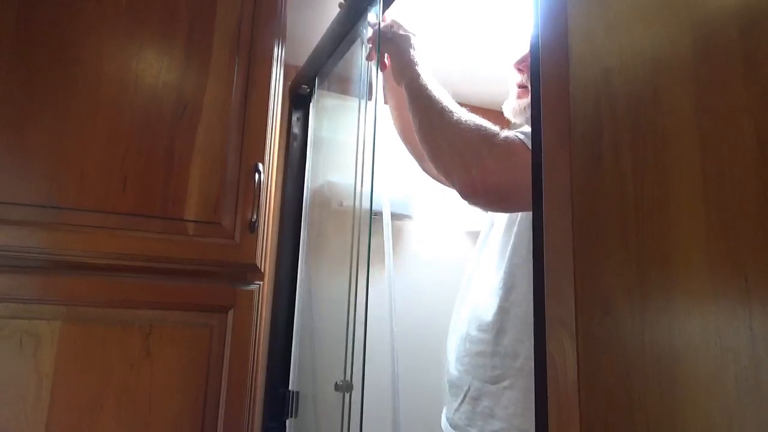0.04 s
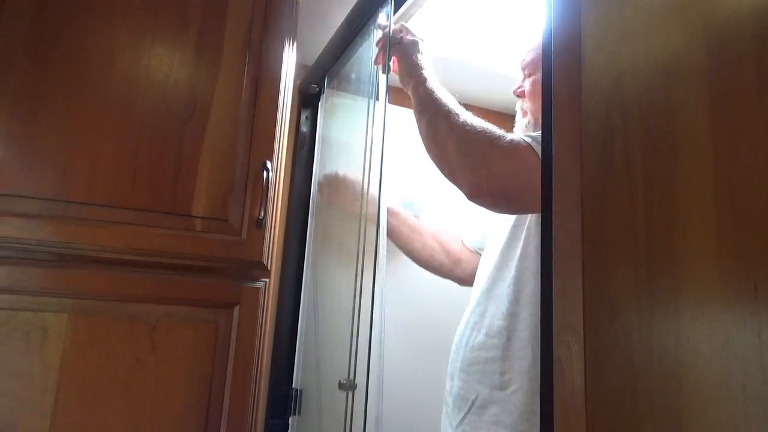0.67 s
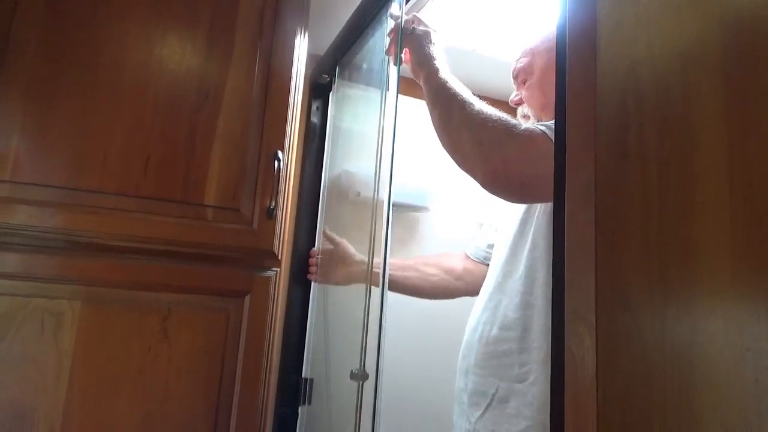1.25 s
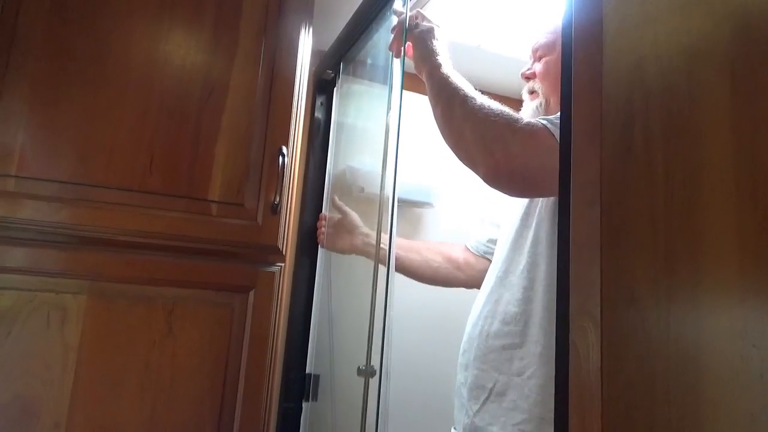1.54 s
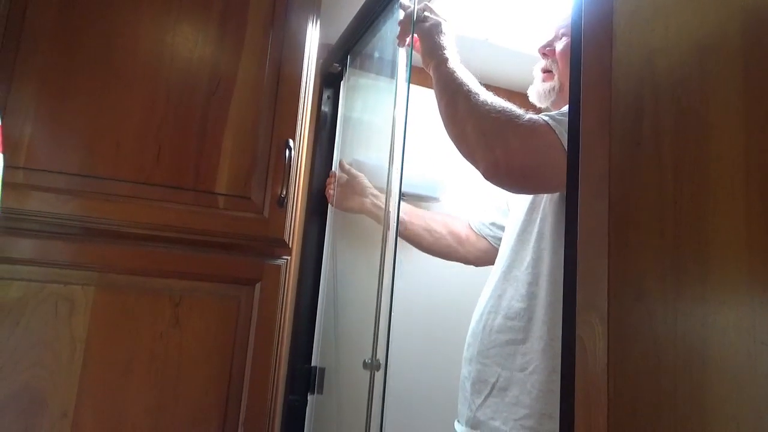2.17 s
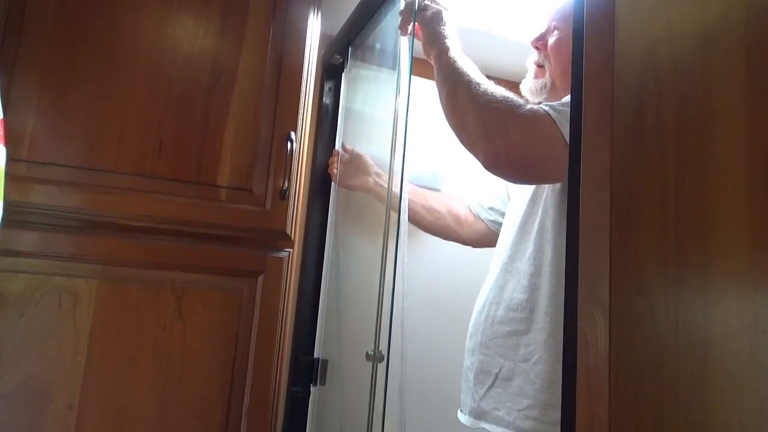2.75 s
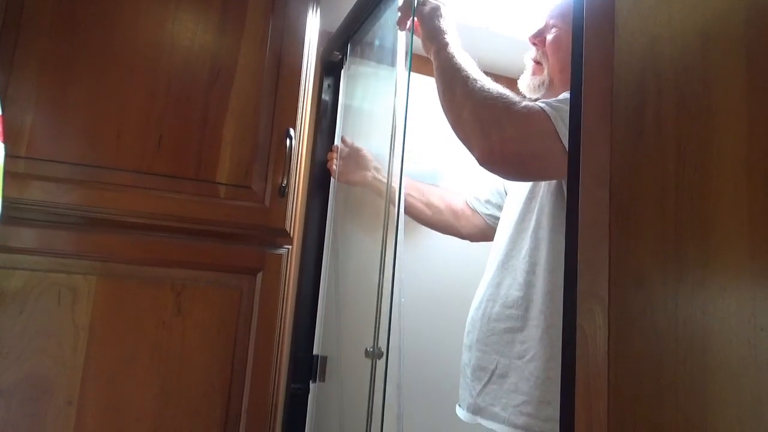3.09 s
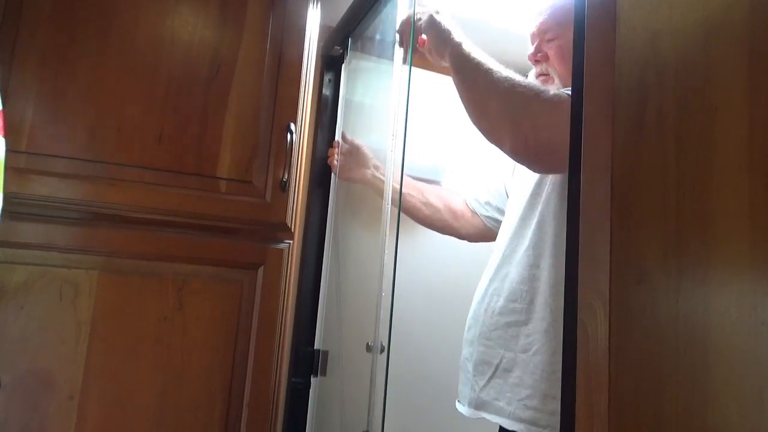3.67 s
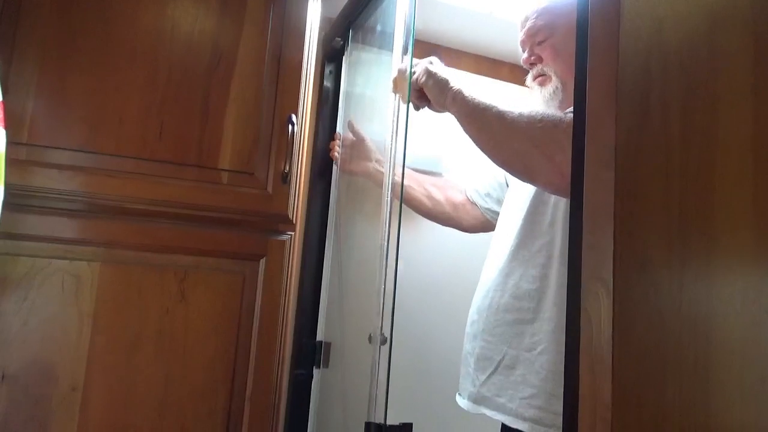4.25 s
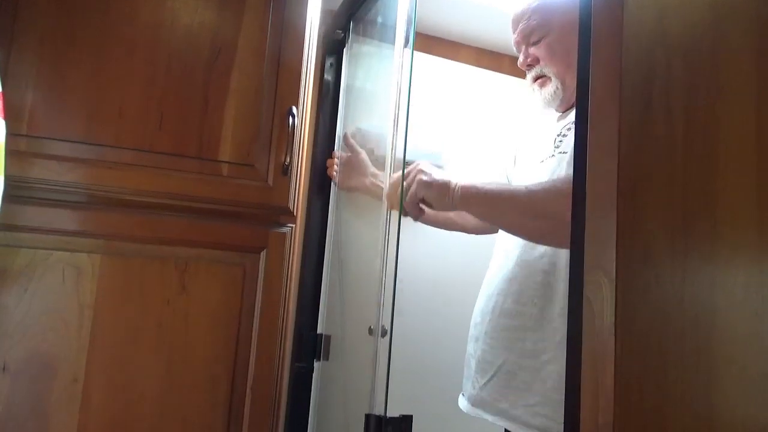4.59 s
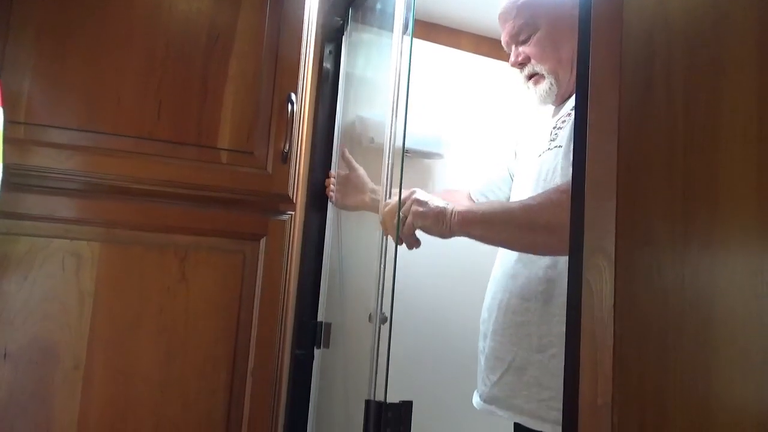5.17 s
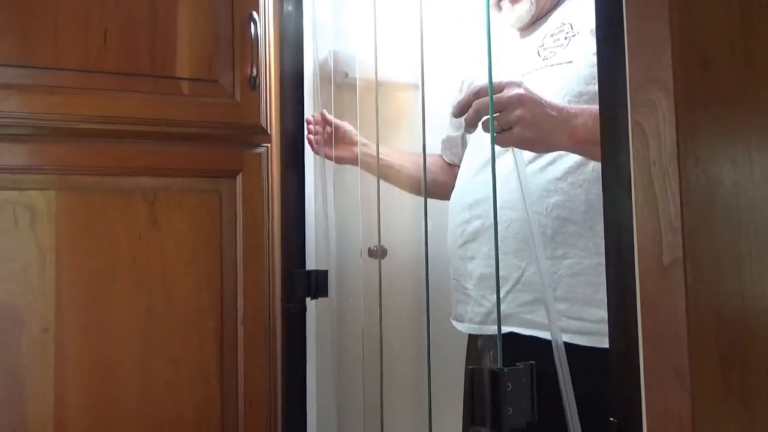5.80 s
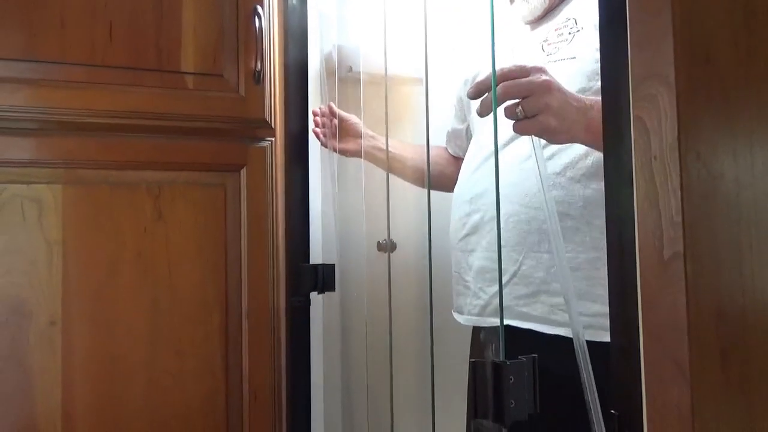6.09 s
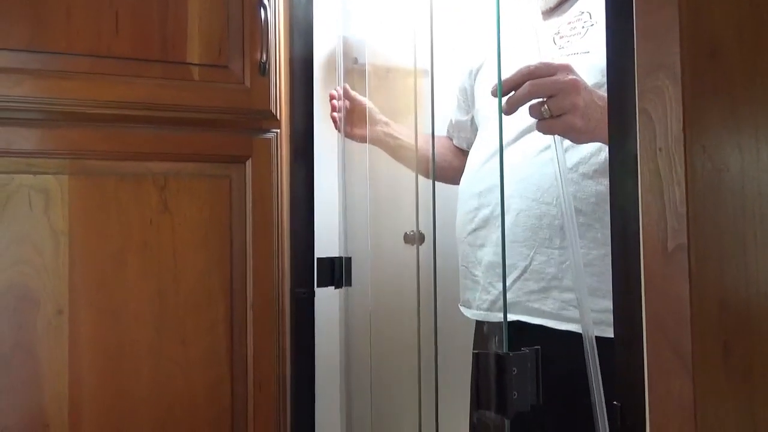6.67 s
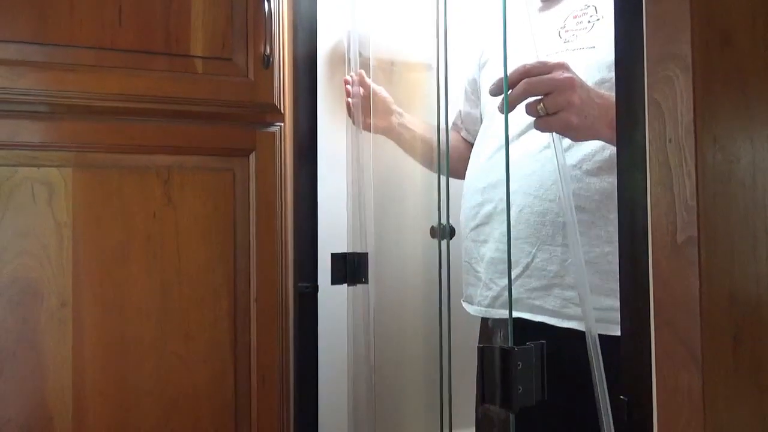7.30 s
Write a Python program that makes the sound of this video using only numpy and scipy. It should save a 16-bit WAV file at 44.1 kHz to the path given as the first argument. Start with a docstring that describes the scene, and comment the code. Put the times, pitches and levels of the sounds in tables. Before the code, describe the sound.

A faint fan hums throughout in a small shower stall with short echoes, under low swells of microphone handling rumble. At the start, fingers hiss briefly along a plastic edge strip. Just after 1 second a glass door clacks twice against its frame, followed by softer scuffs. Light clicks come near 2.4 and 3.1 to 3.3 seconds. At 3.5 seconds the strip snaps home with a sharp crack, the loudest sound, and the pane rings briefly. A cluster of knocks, scuffs and soft rubbing follows from 4 to 4.7 seconds. Around 5 seconds the strip drags on the glass with a faint squeak, and the sound dips for an instant at 5.4. Dull knocks land near 5.7. From 6 seconds the door swings with a crackling scrape and small ticks, groaning low near 6.4, with further knocks around 6.8 and 7.4 seconds.

```python
"""A small shower stall, where plastic edge strips are being pressed onto a glass door.
A fan hums under swells of low handling rumble on the microphone. Fingers hiss along a strip, and the door
clacks and scuffs against its frame. Once, the strip snaps home in a run of slips and sets the pane
ringing; then it drags on the glass. The level dips briefly, and the door swings with a crackling scrape
and a low groan."""
import sys
import numpy as np
from scipy import signal
from scipy.fft import rfft, irfft, next_fast_len
from scipy.io import wavfile
from scipy.ndimage import uniform_filter1d

SR = 44100
rng = np.random.default_rng(int(sys.argv[2]) if len(sys.argv) > 2 else 0)


def bounce(signal):
    """Save signal as a 16-bit WAV file at the path given by the first command-line argument."""
    frames = np.transpose(np.atleast_2d(signal))
    limited = np.clip(frames, -1, 1)
    pcm = np.round(limited * 32767).astype(np.int16)
    wavfile.write(sys.argv[1], SR, pcm)


N = 328104
TIME = np.arange(N) / SR
TAIL = 24576   # samples in one echo or ring-out
CUTOFF_HZ = 11050


def from_db(db):
    """Decibels to gain."""
    return 10 ** (np.asarray(db) / 20)


def rms_one(x):
    """Scale to rms 1."""
    return x / np.sqrt(np.mean(x ** 2) + 1e-20)


def at_level(hit, db):
    """Give a hit the energy of 35 ms of sound at this level."""
    return hit * from_db(db) / np.sqrt(np.sum(hit.mean(0) ** 2) / (.035 * SR))


def at_hz(points, hz):
    """Read a curve on a log-frequency axis."""
    f, value = np.transpose(points)
    return np.interp(np.log(np.maximum(hz, 1)), np.log(f), value)


def bins(x):
    """Frequencies of the spectrum of x."""
    return np.fft.rfftfreq(x.shape[-1], 1 / SR)


def equalise(x, curve, tilt_db=0):
    """Minimum-phase EQ, with a tilt per octave around 1 kHz."""
    hz, n = bins(x), x.shape[-1]
    gain_db = at_hz(curve, hz) + tilt_db * np.log2(np.clip(hz, 100, CUTOFF_HZ) / 1000)
    cepstrum = irfft(np.log(from_db(gain_db)), n)
    cepstrum[1:n // 2] *= 2
    cepstrum[n // 2 + 1:] = 0
    return irfft(rfft(x) * np.exp(rfft(cepstrum)), n)


def band(x, low_hz, high_hz):
    """Second-order band-pass."""
    return signal.sosfilt(signal.butter(2, [low_hz, high_hz], "band", fs=SR, output="sos"), x)


def top_cut(x):
    """Steep low-pass."""
    return signal.sosfilt(signal.ellip(12, .1, 80, CUTOFF_HZ, fs=SR, output="sos"), x)


def drift(rate_hz):
    """Random modulation gliding between values of spread 1."""
    knots = rng.standard_normal(2000)
    return np.interp(TIME * rate_hz, np.arange(len(knots)), knots)


def swells(rows, drop_db=8.5, roundness=1.68):
    """Envelope of pushes, each drop_db down at one swell time before its peak and one fade time after."""
    gain = 0
    for s, peak_db, swell_s, fade_s in rows:
        away = np.maximum((s - TIME) / swell_s, (TIME - s) / fade_s)
        gain = gain + from_db(peak_db - drop_db * np.minimum(away, 10) ** roundness)
    return gain


def ringing(modes):
    """One dying sine for each mode."""
    t = np.arange(TAIL) / SR
    return np.array([np.sin(2 * np.pi * hz * t) * from_db(db - 60 * t / t60) for hz, db, t60 in modes])


def add(out, s, sound):
    """Mix a sound in at time s."""
    i = round(s * SR)
    out[:, i:i + sound.shape[1]] += sound[:, :max(N - i, 0)]


# Stereo width of the room sound: (frequency [Hz], side level re mid [dB])
WIDTH = [(60, -12.5), (190, -9), (600, -0.5), (1500, -1.5), (3500, -4), (10000, -8)]
def diffuse(n):
    """Stereo noise arriving from all sides."""
    mid, side = rng.standard_normal((2, n))
    side = irfft(rfft(side) * from_db(at_hz(WIDTH, bins(side))), n)
    return mid + side * np.array([[1], [-1]])


# Reverb time of the stall: (frequency [Hz], t60 [s])
STALL_DECAY = [(150, 0.63), (500, 0.34), (1500, 0.22), (3000, 0.23), (10000, 0.14)]
def stall_echo(rise_s=0.0015, direct=7.5, late_db=-33, late_t60=1.0, build_cycles=3.0):
    """A direct click, crowded wall echoes, then a faint dull tail from the room outside."""
    t, walls = np.arange(TAIL) / SR, diffuse(TAIL)
    spectrum, octave = rfft(walls), np.log2(np.clip(bins(t), 125, 8000) / 125)
    out = 0
    for k, hz in enumerate(125 * 2 ** np.arange(7)):
        octave_band = irfft(spectrum * np.maximum(1 - abs(octave - k), 0))
        build = 1 - np.exp(-t * hz / build_cycles)   # lows build up more slowly between the walls
        out = out + octave_band * build * from_db(-60 * t / at_hz(STALL_DECAY, hz))
    out += band(walls[:, ::-1], 320, 1800) * from_db(late_db - 60 * t / late_t60)
    out[:, round(SR / 1000)] += direct
    return out * np.minimum(t / rise_s, 1) * np.minimum(t[::-1] * 10, 1)


# The fan's hum: (frequency [Hz], opening level [dB])
FAN_TONES = [(199.5, -76.5), (249.5, -76.5), (359, -78.5), (398.4, -85), (497, -71), (597.5, -77),
             (746, -78), (894, -79)]
# EQ of the moving air: (frequency [Hz], gain [dB])
AIR_EQ = [(20, 1), (85, -2.5), (140, -2.5), (190, -2), (320, -2), (745, -6), (1780, -11.5), (2570, -12),
          (3930, -16.5), (11000, -22.5), (14000, -60)]
def fan(mains_hz=121.3, waver_db=2.1, wander_rad=.5, lift_db=2, extra_mains_lift_db=4):
    """Wavering fan tones and mains hum over soft air; the bed comes back a little louder after the dip."""
    after_dip = TIME > DIP_S
    mains = (mains_hz, -70.5 + extra_mains_lift_db * after_dip)
    hum = 0
    for hz, db in [mains, *FAN_TONES]:
        amplitude = np.sqrt(2) * from_db(db + waver_db * drift(4.5))
        hum = hum + amplitude * np.sin(2 * np.pi * hz * TIME + wander_rad * drift(3.0))
    air = rms_one(equalise(diffuse(next_fast_len(N, True)), AIR_EQ)[:, :N])
    return (hum + from_db(-60.5) * air) * from_db(lift_db * after_dip)


# Swells of handling noise: (peak time [s], level [dB], swell [s], fade [s])
RUMBLE_SWELLS = [(.1, -62, .2, 0.15), (1.4, -64.5, 0.46, 0.44), (4.25, -66.5, 0.89, 0.82),
                 (6.38, -54, 0.19, 0.49), (7.42, -55.5, 0.28, .2)]
def handling_rumble(low_hz=22, high_hz=66):
    """Low handling rumble on the microphone, swelling and fading."""
    return swells(RUMBLE_SWELLS) * rms_one(band(rng.standard_normal(N), low_hz, high_hz))


# Finger strokes along the strip: (peak time [s], level [dB], swell [s], fade [s])
STROKES = [(.15, -45, 0.072, 0.037), (.355, -56, 0.069, 0.056), (1.0, -59, 0.29, 0.65),
           (3.8, -61.5, 0.28, 0.31), (4.52, -60.5, 0.19, .33), (5.34, -64.5, 0.12, 0.12)]
# Bright EQ of skin on plastic: (frequency [Hz], gain [dB])
RUB_EQ = [(1800, -21.5), (2700, -13), (3500, -5.5), (6500, -7), (8300, -1), (10000, -1), (11000, -9)]
def finger_rub(grain_db=1.5, grains_per_s=120):
    """Skin on plastic hisses; each stroke is at a new spot, with its own echoes."""
    friction = rng.standard_normal(N) * from_db(grain_db * drift(grains_per_s))
    out = np.zeros((2, N))
    for stroke in STROKES:
        echo = top_cut(equalise(stall_echo(), RUB_EQ))
        echo /= np.linalg.norm(echo.mean(0))
        hiss = swells([stroke]) * friction
        out += signal.oaconvolve(hiss[None], echo, axes=1)[:, :N]
    return out


def clack(echo, hz, spread):
    """A broad resonance of the strip, steeper on its upper side."""
    return band(band(echo, hz / spread, hz * spread), hz / 2 / spread, hz * spread)


def contact(hz, clack_db, thud_db, tick_db, rise_s):
    """A clack from the strip, a thud and a weak boom from the door's mass, a tick from the hard edge."""
    echo = stall_echo(rise_s)
    thud = at_level(band(echo, 310, 830), thud_db)
    boom = at_level(band(echo, 160, 300), thud_db - 7)
    tick = at_level(band(echo, 3200, 10200), tick_db)
    return at_level(clack(echo, hz, spread=1.53), clack_db) + thud + boom + tick


# Door hits on the frame: (time [s], clack pitch [Hz], clack [dB], thud [dB], tick [dB])
KNOCKS = [(1.07, 1960, -39.5, -56, -47), (1.154, 1840, -39, -51.5, -59), (1.400, 1770, -49, -57, -74),
          (2.359, 2280, -48.5, -64, -58.5), (3.071, 1840, -52.5, -60.5, -59),
          (3.946, 1670, -52.5, -57, -62), (4.187, 1850, -47.5, -50.5, -66), (4.218, 1080, -51, -41, -82),
          (4.294, 1630, -43.5, -51.5, -58), (4.661, 1780, -62.5, -63, -77),
          (5.644, 1980, -46.5, -55, -56.5), (5.717, 704, -65, -42.5, -57.5), (5.781, 810, -58, -49.5, -57),
          (6.727, 1190, -52.5, -43, -61), (6.802, 1930, -49, -46.5, -64), (7.425, 2430, -49, -52, -59.5)]
# Ring of the edge strip: (frequency [Hz], level re clack [dB], t60 [s])
STRIP_MODES = [(1852, -6.5, 0.095), (2294, -7, 0.11), (2920, -21, 0.12), (3440, -11, 0.1), (5500, -19, .14)]
def door_knocks(settle_s=.025, settle_pitch_ratio=0.66, settle_db=-7.5):
    """A sharp contact rings the strip; the door then settles with a lower, softer clack."""
    out, modes = np.zeros((2, N)), ringing(STRIP_MODES)
    for s, hz, clack_db, thud_db, tick_db in KNOCKS:
        add(out, s, contact(hz, clack_db, thud_db, tick_db, rise_s=0.0019))
        ring = rng.choice([-1, 1], len(modes)) @ modes
        add(out, s, from_db(clack_db) * ring[None])
        settle = clack(stall_echo(rise_s=0.002), hz * settle_pitch_ratio, spread=1.24)
        add(out, s + settle_s, at_level(settle, clack_db + settle_db))
    return out


# Ring of the pane and its frame: (frequency [Hz], relative level [dB], t60 [s])
PANE_MODES = [(170.1, -30, 1), (491, -25, 0.63), (533, -22, .25), (937, -16.5, 0.42), (1160, -23, .25),
              (1360, -21, 0.18), (1516, -11.5, 0.22), (1460, -22, .3), (1570, -13.5, 0.32),
              (2190, -12.5, 0.18), (3100, -11, 0.2), (3170, -23, .22), (3540, -30.5, 0.24), (4460, -10, .2),
              (4743, -22, 0.21), (6940, -28, .16)]
def pane_ring(snap_db=-18, contact_db=-3):
    """The glass rings out at the snap, and faintly at each knock or scuff in the modes near its pitch."""
    out, modes = np.zeros((2, N)), ringing(PANE_MODES)
    hz = np.array(PANE_MODES)[:, 0]
    full_ring = rng.choice([-1, 1], len(hz)) @ modes
    add(out, SNAP_SLIPS[3][0], from_db(snap_db) * full_ring[None])
    for s, pitch, clack_db, *_ in KNOCKS + SCUFFS:
        nearness = np.exp(-(2 * np.log2(hz / pitch)) ** 2)
        strength = from_db(clack_db + contact_db) * nearness * rng.uniform(-2, 2, len(hz))
        add(out, s, (strength @ modes)[None])
    return out


# Soft brushes along the frame: (time [s], clack pitch [Hz], clack level [dB])
SCUFFS = [(1.291, 1770, -46), (1.450, 1720, -54.5), (1.524, 2650, -54), (1.559, 1470, -52.5),
          (2.404, 1930, -57.5), (3.250, 2000, -55.5), (4.38, 1600, -48), (4.449, 1410, -51.5),
          (5.221, 1700, -57.5), (6.600, 2030, -48)]
def door_scuffs():
    """The door meets the frame slowly: soft attacks, all with the same balance of thud and tick."""
    out = np.zeros((2, N))
    for s, hz, db in SCUFFS:
        add(out, s, contact(hz, db, thud_db=db - 1.5, tick_db=db - 11, rise_s=0.025))
    return out


# Catches as the strip is pushed and as the door swings: (time [s], level [dB])
CATCHES = [(3.194, -57), (3.217, -53.5), (3.254, -50), (6.058, -59.5), (6.158, -56), (6.245, -51.5),
           (6.293, -54.5), (6.492, -53), (6.676, -57), (6.894, -56), (6.985, -61.5), (7.08, -61),
           (7.22, -59.5), (7.282, -57), (7.323, -55.5)]
# EQ of their tick: (frequency [Hz], gain [dB])
CATCH_EQ = [(700, -6.5), (2500, -2), (3600, -3), (7000, -8), (9200, -2), (11000, -19)]
def plastic_catches(seal_hz=3000, seal_width_hz=350, seal_db=-6.5):
    """Plastic catches on glass with a bright tick; while the door swings, the seal rings too."""
    out = np.zeros((2, N))
    for s, db in CATCHES:
        echo = stall_echo(rise_s=0.0039)
        add(out, s, at_level(equalise(echo, CATCH_EQ), db))
        if s > SWING[0][0]:
            seal = band(echo, seal_hz - seal_width_hz / 2, seal_hz + seal_width_hz / 2)
            add(out, s, at_level(seal, db + seal_db))
    return out


# The quick slips that make up the snap: (time [s], level [dB], treble tilt [dB/octave])
SNAP_SLIPS = [(3.509, -31, 0), (3.513, -20, 6.5), (3.517, -25.5, -0.5), (3.524, -31.5, 0),
              (3.532, -26.5, -2.5), (3.548, -28, 2.5), (3.558, -35.5, -4), (3.571, -42.5, -4.5),
              (3.592, -45, -7.5)]
# EQ of the crack: (frequency [Hz], gain [dB])
SNAP_EQ = [(60, -47), (160, -25), (310, -18), (385, -22), (510, -3.5), (830, -7), (930, -3.5), (1540, 0.5),
           (2570, -6), (3100, -1), (5500, -5.5), (8200, -4), (11000, -21)]
def strip_snap():
    """The strip snaps over the edge: early slips are brightest, later ones shake the whole door."""
    out = np.zeros((2, N))
    for s, db, tilt_db in SNAP_SLIPS:
        echo = stall_echo(direct=8.0, late_db=-29)
        add(out, s, at_level(equalise(echo, SNAP_EQ, tilt_db), db))
    return out


def sing(hz, width_hz):
    """Friction feeds one resonance and keeps its level fairly even; rms 1."""
    tone = band(rng.standard_normal(N), hz - width_hz / 2, hz + width_hz / 2)
    power = uniform_filter1d(tone ** 2, SR // 50) + 1e-12
    return rms_one(tone / power ** .25)


def strip_drag(start_s=4.92, end_s=5.44, fade_s=0.014, level_db=-65):
    """The dragged strip scuffs and makes two modes of the pane sing faintly and unevenly."""
    touching = np.clip(np.minimum(TIME - start_s, end_s - TIME) / fade_s, 0, 1)
    friction = 0.53 * rms_one(band(rng.standard_normal(N), 800, 3100))
    low_mode = sing(hz=1335, width_hz=110) * from_db(2 * drift(20))
    high_mode = sing(hz=1592, width_hz=110) * from_db(2 * drift(14))
    return from_db(level_db) * touching * rms_one(low_mode + high_mode + friction)


DIP_S = 5.421
def level_dip(length_s=0.015, depth_db=-20):
    """Gain that ducks the whole mix once, briefly."""
    inside = (TIME > DIP_S) & (TIME < DIP_S + length_s)
    return from_db(depth_db * uniform_filter1d(inside.astype(float), size=200))


# Scrape envelope, following the speed of the door: (time [s], level [dB])
SWING = [(5.9, -90), (6.1, -55.5), (6.42, -52.5), (6.7, -51), (6.95, -54.5), (7.44, -54)]
# EQ of the scrape: (frequency [Hz], gain [dB])
SCRAPE_EQ = [(180, -16), (300, -2.5), (490, -7.5), (620, -9.5), (1450, -6), (1900, -9), (2500, -9.5),
             (3000, -6.5), (4800, -18.5), (8900, -13.5), (11000, -23)]
def seal_scrape(slips_per_s=300, size_spread_db=7.0):
    """As the door swings, its seal drags in tiny slips of uneven size that crackle."""
    envelope = from_db(np.interp(TIME, *np.transpose(SWING)))
    sizes = from_db(size_spread_db * np.minimum(rng.exponential(1, N), 3))
    slips = sizes * rng.choice([-1, 1], N) * (rng.random(N) < slips_per_s / SR)
    echo = equalise(stall_echo(direct=6.2), SCRAPE_EQ)
    return envelope * rms_one(signal.fftconvolve(slips[None], echo, axes=1)[:, :N])


# Groans during the swing: (peak time [s], level [dB], swell [s], fade [s])
GROANS = [(6.41, -50, 0.1, 0.16), (6.95, -61.5, 0.71, 0.49)]
def door_groan():
    """Under load, friction makes the door sing one low note."""
    return swells(GROANS) * sing(hz=209, width_hz=12)


# Stereo placement of the door: (frequency [Hz], left phase re right [rad])
DOOR_PHASE = [(60, -0.23), (500, -0.5), (1400, -0.9), (3200, -.6), (6500, -0.66), (11000, -0.31)]
def from_door(x):
    """Sound from the door is narrow and arrives on the right first."""
    mid = x.mean(0)
    narrow = mid + (x - mid) / 3
    skew = np.tan(at_hz(DOOR_PHASE, bins(x)) / 2) * np.array([[1], [-1]])
    return irfft(rfft(narrow) * (1 + 1j * skew), N)


def scene():
    """The door work over a bed of fan and handling rumble, with one brief dip in level."""
    door = door_knocks() + door_scuffs() + plastic_catches() + strip_snap() + pane_ring()
    door += seal_scrape() + door_groan() + strip_drag() + finger_rub()
    return (from_door(door) + fan() + handling_rumble()) * level_dip()


def record(dry):
    """The top of the treble is cut from the mix."""
    return top_cut(dry)


dry = scene()
out = record(dry)
bounce(out)
```